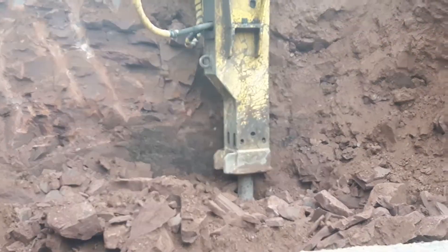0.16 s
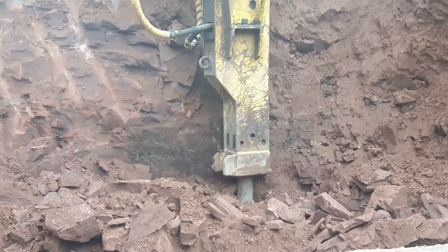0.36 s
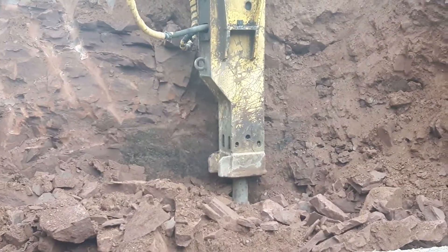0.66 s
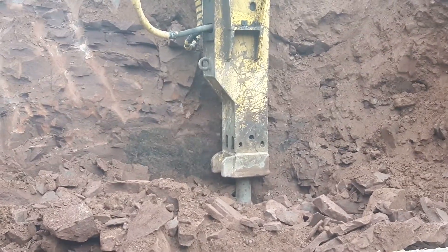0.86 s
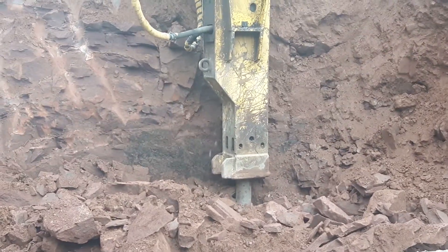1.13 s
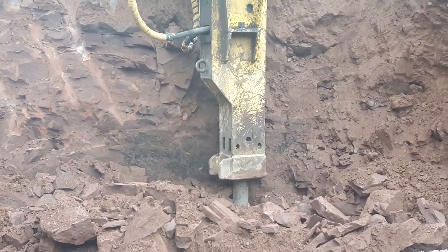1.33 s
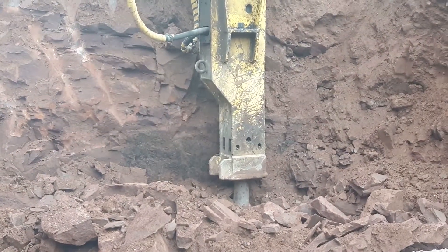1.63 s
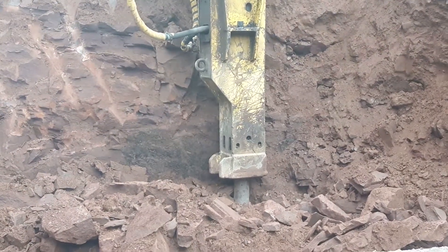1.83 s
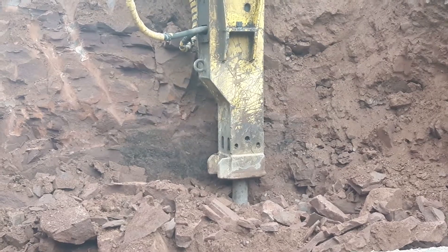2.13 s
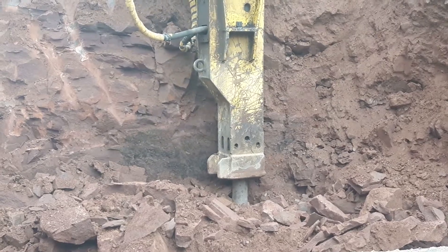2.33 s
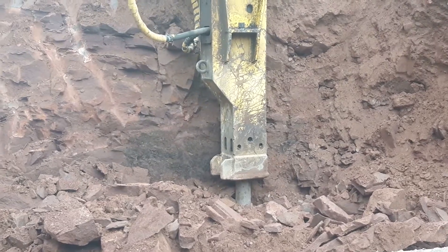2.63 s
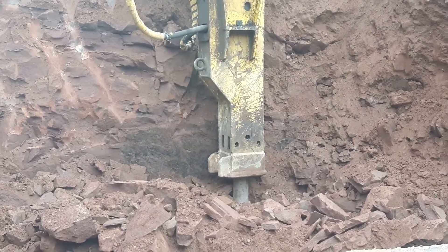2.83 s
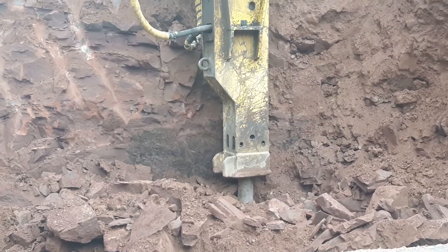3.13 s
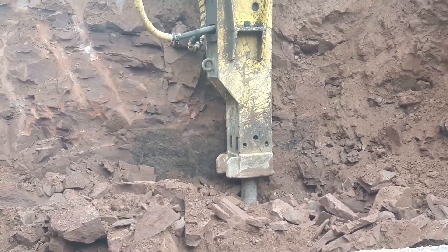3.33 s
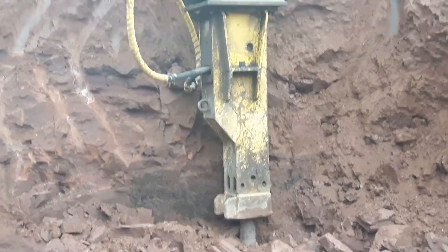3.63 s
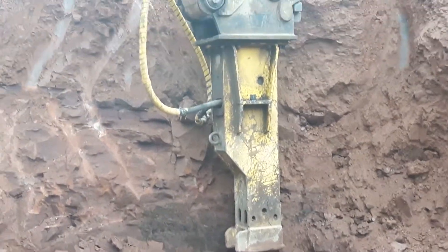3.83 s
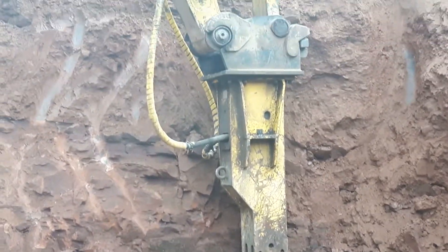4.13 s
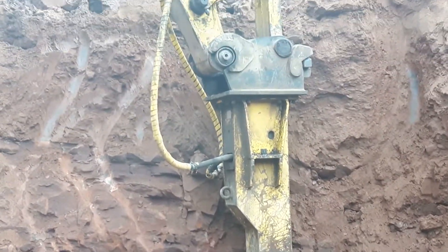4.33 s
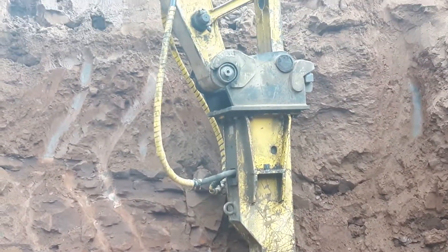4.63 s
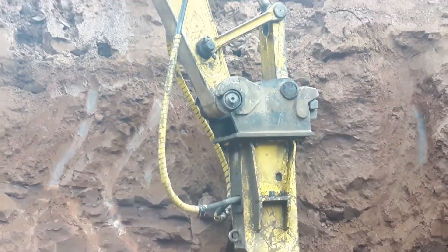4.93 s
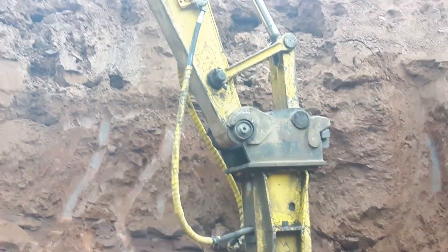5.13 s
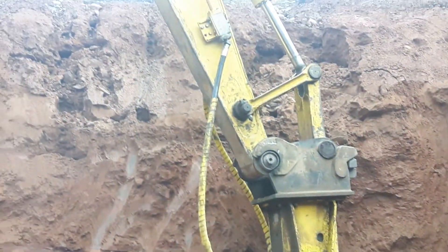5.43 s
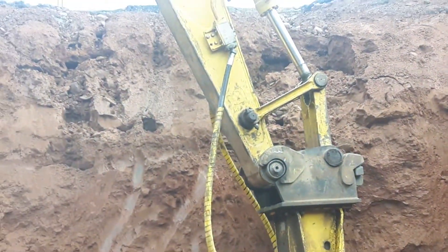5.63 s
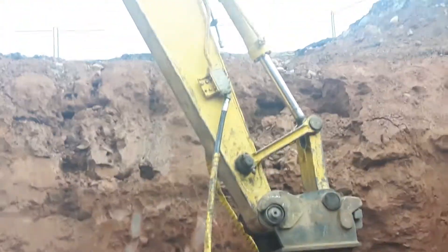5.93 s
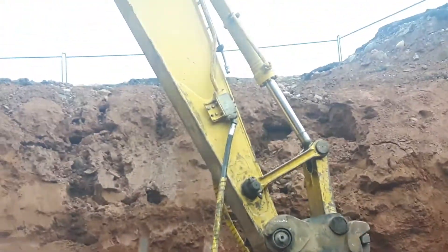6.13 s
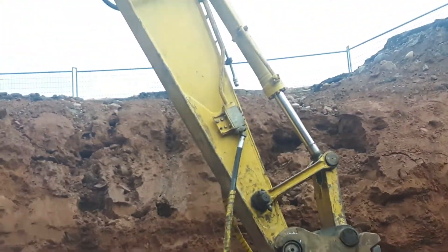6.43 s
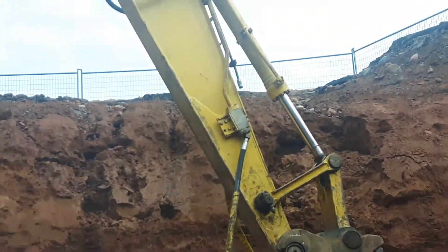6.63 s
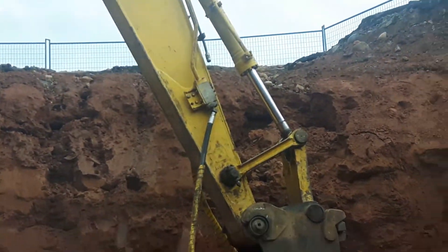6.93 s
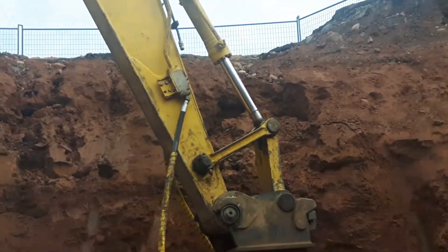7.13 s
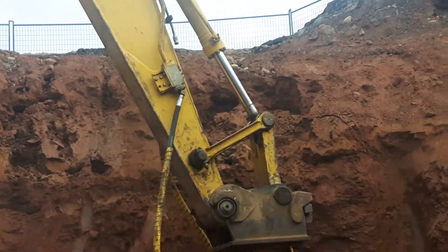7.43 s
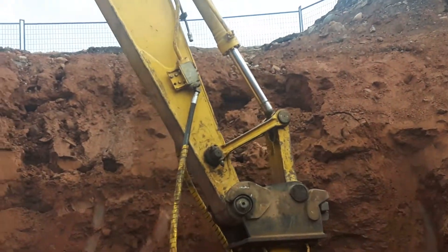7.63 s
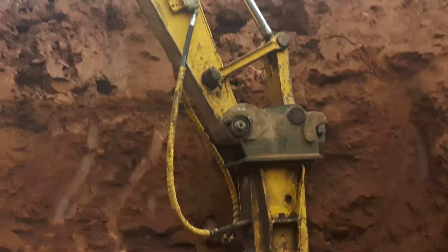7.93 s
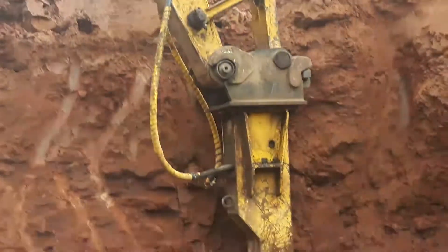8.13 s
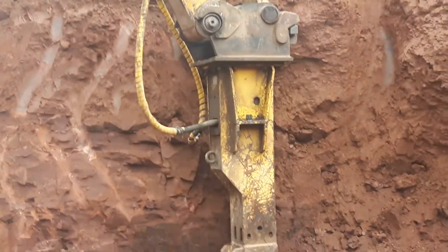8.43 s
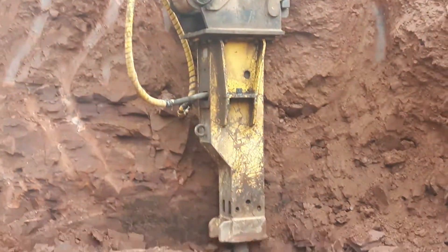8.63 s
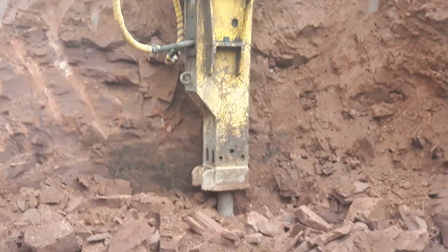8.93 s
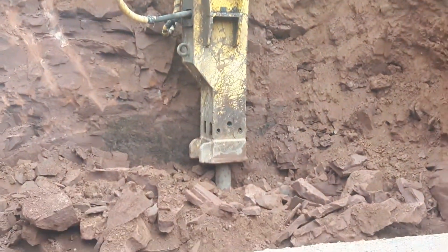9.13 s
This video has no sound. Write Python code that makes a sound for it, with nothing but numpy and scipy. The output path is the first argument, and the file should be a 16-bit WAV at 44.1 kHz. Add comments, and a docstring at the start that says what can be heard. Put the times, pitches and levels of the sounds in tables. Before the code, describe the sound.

Outdoors in a rock pit, loud machine hammering starts at once: dry, metallic, low-mid heavy blows with a bright click before each, almost identical. Around the middle the tool slips and the tone changes for a few strokes, then continues duller. After seven seconds the blows cease and the excavator engine hums on, low and throbbing, with faint oil hiss, wavering whine and a few muffled knocks. Single microphone whose level slowly recovers after the hammering.

```python
"""A valve snaps, then a hydraulic breaker strikes rock in an open pit, about eight blows a second, until it stops.
Each snap and blow is an impulse on damped steel modes and noise bands; ground and pit walls echo it dully.
Beneath runs a diesel: firing tones, throbbing noise, pump whine and oil hiss; loose parts knock as noise bursts.
A slow gain control lets the engine up once the blows have ceased."""
import sys
import numpy as np
from scipy import signal
from scipy.io import wavfile
from scipy.ndimage import uniform_filter1d

SR = 44100
rng = np.random.default_rng(int(sys.argv[2]) if len(sys.argv) > 2 else 0)


def file_out(sig):
    """Save sig as 16-bit WAV at sys.argv[1]."""
    # one column per channel
    cols = np.atleast_2d(sig).T
    # limit, then scale
    lim = np.clip(cols, -1, 1)
    pcm = np.round(lim * 32767).astype(np.int16)
    wavfile.write(sys.argv[1], SR, pcm)


N = 408807

# Modes of housing, tool and boom: f/Hz, relative level/dB at first, level/dB as the tool sinks in,
# level/dB once it has reseated, longest t60/s
STEEL_MODES = [(93.3, -29, -16, -28.5, 0.65), (166, -20, -19.5, -17, 0.27), (191.7, -9.5, -6, -11, 0.13),
               (251, -13, -17, -18, 0.14), (261.7, -13.5, -16, -20.5, 0.26), (288.1, -9.5, -6, -11.5, 0.26),
               (326.8, -3.5, -5, -4, 0.19), (400.5, -13.5, -20.5, -11, 0.45), (496.4, -28.5, -21.5, -23, 1),
               (547, -17, -14, -14.5, 0.26), (597, -15.5, -18, -14, .12), (761, 0.5, -6, -23, 0.077),
               (827.4, -20, -18, -6, 0.1), (859, -53, -72, -19.5, 0.54), (987.5, -84, -27.5, -45, 0.027),
               (1168.5, -21, -13, -13, 0.095), (1473.5, -20, -17, -20, 0.075),
               (1588, -20, -18, -25.5, 0.11), (1696, -21.5, -26.5, -11.5, 0.054),
               (1883, -26, -52, -30, 0.13), (2260, -60, -49, -27.5, 0.12), (2446, -22.5, -21, -19.5, 0.055),
               (2735, -26.5, -31, -43, 0.095), (2846, -30, -32.5, -28, 0.087),
               (3050, -73, -77, -27.5, 0.052), (3405, -33, -35, -54, 0.19), (3730, -69.5, -35, -34, 0.098),
               (4630, -36, -50, -43, 0.087), (5780, -24.5, -23, -18.5, 0.012), (6840, -32, -32, -52, .05),
               (8220, -50, -57, -57, 0.023), (7780, -29, -26.5, -35, 0.014), (9900, -32.5, -34, -60, .1),
               (15200, -57.5, -39, -36, .05)]
# Spectrum of the valve snap against that of the blow: f/Hz, level/dB
SNAP_SPECTRUM = [(100, -22.5), (400, -3.5), (1000, -6), (2000, 3.5), (2900, 0.5), (3500, 6.5), (4400, 13.5),
                 (5600, -5), (7900, 8.5), (10000, -3), (16000, 13.5)]
STAGES_S = 0.5, 3.5, 4.4, 4.7   # first, sunk in, slips, reseated
EDGES_HZ = 40 * 2 ** np.arange(0, 8.8, 1 / 3)   # third-octave band edges


def amp(db):
    """Decibel definition: amplitude ratio 10^(dB/20)."""
    return np.exp(np.asarray(db) * (np.log(10) / 20))


def rms_one(x):
    """Normalisation by mean power: scale to rms 1."""
    return x / np.sqrt(np.mean(x ** 2) + 1e-20)


def high_pass(x, order, hz):
    """Butterworth high-pass: maximally flat above its corner."""
    return signal.sosfilt(signal.butter(order, hz, "high", fs=SR, output="sos"), x)


def at_hz(points, hz):
    """Linear interpolation of a spectrum on a log-frequency axis."""
    table = np.array(points)
    return np.interp(np.log(hz), np.log(table[:, 0]), table[:, 1])


def brightness(hz):
    """Octave scale: 0 up to 1 kHz (the body), rising to 1 from 4 kHz (the treble)."""
    return np.clip(np.log2(hz / 1000) / 2, 0, 1)


def bump(hz, centre_hz, spread):
    """Gaussian resonance bell on an octave axis, top 1."""
    return np.exp(-(np.log2(hz / centre_hz) / spread) ** 2)


def drift(rate_hz):
    """Low-passed white noise: a slow random wander of rms 1."""
    step = 40   # samples between computed points
    r = np.exp(-2 * np.pi * rate_hz * step / SR)
    white = rng.standard_normal(N // step + 2002)
    slow = signal.lfilter([1], [1, -2 * r, r * r], white)[2000:]   # drop the filter's start
    return np.interp(np.arange(N) / step, np.arange(len(slow)), rms_one(slow))


def clicks(times, gains):
    """Impulse train: single samples at the given times."""
    out = np.full(N, 1e-18)
    out[np.round(np.asarray(times) * SR).astype(int)] = gains
    return out


def dying(train, t60, rise_s):
    """Exponential decay: each click opens an envelope that rises fast and dies in t60."""
    rise = np.exp(-1 / (rise_s * SR))
    decay = amp(-60 / (t60 * SR))
    return signal.lfilter([1 - rise], np.convolve([1, -rise], [1, -decay]), train)


def ring(drive, hz, t60):
    """Damped harmonic oscillator: a unit click sets a decaying sine of height 1 ringing."""
    r, w = amp(-60 / (t60 * SR)), 2 * np.pi * hz / SR
    return signal.lfilter([0, np.sin(w)], [1, -2 * r * np.cos(w), r * r], drive)


def band_filters():
    """Third-octave analysis: centre frequencies with cascaded band-passes."""
    for low, high in zip(EDGES_HZ, EDGES_HZ[1:]):
        sos = signal.butter(1, [low, high], "band", fs=SR, output="sos")
        yield np.sqrt(low * high), np.vstack([sos, sos])


def bands(white):
    """White-noise principle: equal power per Hz in each band, two noises dealt in turn."""
    for k, (hz, sos) in enumerate(band_filters()):
        yield hz, signal.sosfilt(sos, white[k % 2])


def self_noise():
    """Thermal-type white noise: the microphone's faint hiss, rms -90 dB."""
    return amp(-90) * rng.standard_normal(N)


def engine():
    """Periodic combustion: firing orders and throbbing noise, with phase-locked pump whine and turbulent oil hiss."""
    # Course of the engine: t/s, firing f/Hz, load gain/dB, oil hiss level/dB, pump whine level/dB
    course = [(0, 92.55, 13, -58.5, -56), (7.1, 92, 10, -56, -43), (7.4, 95.56, 6, -71, -53),
              (7.801, 96.35, 6, -74, -50.5), (8.0, 96.48, 4.5, -73, -45), (8.3, 95.8, 5, -71, -43),
              (8.6, 95.6, 6, -65, -45.5), (8.72, 94.6, 4, -65, -39), (8.9, 95.64, 6.5, -63.5, -48),
              (9.02, 93.5, 3.5, -64.5, -43), (9.27, 96.6, 0.5, -66, -41.5)]
    # Clean tones before the load gain: multiple of firing f, rms level/dB, waver/dB
    orders = [(0.99, -40.5, 0.9), (2.2, -44.5, 5.3), (10 / 3, -52, 2.2)]
    # Exhaust, fan and panels: f/Hz, relative spectral density level/dB
    rumble_spectrum = [(18, -80), (30, -39), (55, -14), (77, -8.5), (97, -3), (125, 1.5), (155, 7),
                       (193, 14), (239, -6), (323, 2.5), (445, -10), (563, -6.5), (669, -13.5), (1500, -26),
                       (5000, -79), (6500, -87), (11000, -120)]
    # Oil in the valves: f/Hz, relative spectral density level/dB
    hiss_spectrum = [(1470, -1), (2500, 2), (3350, -4), (3940, 2), (4570, -54), (5130, -8), (6170, -2),
                     (7430, -16), (10500, -7), (15800, -12)]
    whine_order = 6   # multiple of the firing frequency

    s, *columns = np.transpose(course)
    firing_hz, load_db, hiss_db, whine_db = [np.interp(np.arange(N) / SR, s, c) for c in columns]
    phase = 2 * np.pi * np.cumsum(firing_hz * (1 + 0.00073 * drift(2.6))) / SR
    tones = 0
    for order, level_db, waver_db in orders:
        sine = np.sin(order * phase + rng.uniform(0, 2 * np.pi))
        tones = tones + amp(level_db + waver_db * drift(1.8)) * np.sqrt(2) * sine
    throb = 1 + 0.083 * np.cos(phase / 3) + 0.25 * np.cos(phase)
    together, rumble, hiss = drift(4.4), 0, 0   # together: level wander common to all rumble bands
    for hz, band in bands(rng.standard_normal((2, N))):
        rumble = rumble + amp(at_hz(rumble_spectrum, hz) + 0.49 * together + 1.8 * drift(7.4)) * band
        hiss = hiss + amp(at_hz(hiss_spectrum, hz)) * band
    body = amp(load_db) * (tones + amp(-36.5) * throb * rms_one(rumble))
    whine = amp(whine_db) * np.sqrt(2) * np.sin(whine_order * phase)
    return body + whine + amp(hiss_db) * rms_one(hiss)


def knocks():
    """Impact excitation: band-limited noise bursts, heard directly and through the steel modes."""
    # Loose parts knocking: t/s, relative level/dB, low edge f/Hz, high edge f/Hz, t60/s
    impacts = [(7.667, -43.5, 300, 1500, 0.13), (7.853, -37.5, 860, 1260, 0.1),
               (7.979, -52, 690, 1580, 0.084), (8.448, -42, 300, 2270, 0.14), (8.468, -43, 700, 2000, 0.12),
               (8.781, -31, 223, 960, 0.12), (8.797, -32, 273, 674, 0.21), (8.921, -38, 446, 1920, 0.073),
               (8.948, -36, 450, 1360, 0.081)]
    out = np.zeros(N)
    t = np.arange(SR // 3) / SR
    for at, level_db, low_hz, high_hz, t60 in impacts:
        envelope = (1 - np.exp(-t / 0.00071)) * amp(-60 * t / t60)
        burst = rng.standard_normal(len(t)) * envelope
        burst += amp(-38) * sum(ring(burst, hz, t60=0.06) for hz, *_ in STEEL_MODES)
        band = signal.butter(3, [low_hz, high_hz], "band", fs=SR, output="sos")
        start = round(at * SR)
        knock = amp(level_db) * np.sqrt(SR / high_hz) * signal.sosfilt(band, burst)
        out[start:start + len(t)] += knock[:N - start]
    return out


def strokes():
    """Near-periodic excitation: snap and contact times and levels, each a little uneven."""
    # Even strokes, the pace sagging where the tool slips: first snap t/s, number of strokes, period/s,
    # fall of the piston from snap to contact/s
    runs = [(0.0059, 16, .12723, .0331), (2.0427, 8, .1274, .0322), (3.0614, 10, .12702, .0317),
            (4.3444, 2, .1341, .0328), (4.6148, 10, .12915, .0336), (5.9036, 9, .12755, .0334),
            (7.0489, 1, .125, .0328)]
    # Mean strength: t/s, blow level/dB, treble level/dB, snap level against the blow/dB
    force = [(0, -3.5, 0, -8), (0.7, -3, 0.5, -12.5), (1.5, -3, 0.5, -10.5), (2.0, -3, 1.5, -9),
             (2.7, -3.5, -1, -7), (3.7, -3, -1, -10.5), (4.1, -2.5, 0, -11.5), (4.34, -1.5, -4.5, -11.5),
             (4.74, -5.5, 1, -8), (4.87, -3, -2, -8.5), (5.26, -4.5, -0.5, -12.5), (5.9, -4.5, -0.5, -14),
             (6.5, -5, -2.5, -12.5), (7.05, -5, -3, -11.5)]
    uneven_s, uneven_db = 0.00025, (0.4, 0.6, 1.1)   # spreads: time; blow, treble, snap

    s = np.concatenate([first + period * np.arange(count) for first, count, period, _ in runs])
    fall_s = np.concatenate([np.full(count, fall) for _, count, _, fall in runs])
    chance = rng.standard_normal((len(s), 4))
    at, *columns = np.transpose(force)
    levels_db = np.array([np.interp(s, at, c) for c in columns]) + (chance[:, 1:] * uneven_db).T
    s = s + uneven_s * chance[:, 0]
    return s, s + fall_s, *levels_db


def slip_db(s, hz):
    """Spectral weighting in time: the blows change colour for a few strokes while the tool slips."""
    # Colour changes: middle t/s, reach/s, centre f/Hz, level/dB, spread/octaves
    slips = [(4.42, 0.11, 1500, 4.5, 0.15), (4.68, 0.13, 3630, 5, 0.18), (4.71, 0.14, 211, 8.5, 0.7)]
    total_db = 0
    for at, reach, centre_hz, db, spread in slips:
        nearness = np.clip(2 - 2 * np.abs(s - at) / reach, 0, 1)
        total_db = total_db + db * bump(hz, centre_hz, spread) * nearness
    return total_db


def repeating_noise(times, likeness):
    """Correlated excitation: the same steel is struck alike, so each noise nearly repeats the last."""
    length = SR // 5
    starts = np.round(np.r_[0, times] * SR).astype(int)
    fresh = rng.standard_normal((2, len(starts) + 30, length))
    keep = np.clip(likeness, 0, .99)
    rows = signal.lfilter([np.sqrt(1 - keep ** 2)], [1, -keep], fresh, axis=1)[:, 30:]
    stroke = np.searchsorted(starts, np.arange(N), "right") - 1
    return rows[:, stroke, (np.arange(N) - starts[stroke]) % length]


def steel_ringing(blows, noise):
    """Modal superposition: snap, recoil, push and rebound drive damped modes, with noise for the high ones."""
    s, hit, peak_db, treble_db, snap_db = blows
    push_s, rebound_s, valve_seats_s = 0.0027, 0.0145, 0.0149   # after contact, contact, snap
    most_cycles = 300   # a mode of the bolted steel rings no longer
    out = np.zeros(N)
    for hz, first_db, sunk_db, late_db, t60 in STEEL_MODES:
        bright = brightness(hz)
        mode_db = np.interp(s, STAGES_S, [first_db, sunk_db, sunk_db, late_db])
        level_db = peak_db + mode_db + bright * treble_db + slip_db(s, hz)
        gain = amp(level_db + 1.0 * rng.standard_normal(len(s)))
        snap = clicks(s, gain * amp(snap_db + at_hz(SNAP_SPECTRUM, hz)))
        rattle = amp(-21.5) * noise[0] * dying(snap + clicks(hit, gain), t60=0.1, rise_s=0.00081)
        push = clicks(hit + push_s, gain) - clicks(hit, .5 * gain)   # the housing recoils, then follows
        push += clicks(hit + rebound_s, 3.4 * gain * bump(hz, 1430, 0.24))
        push += clicks(s + valve_seats_s, 0.17 * gain) + snap
        drive = (1 - 0.85 * bright) * push + np.clip(0.23 + bright, 0, 1) * rattle
        out += ring(drive, hz, min(t60, most_cycles / hz))
    return out


def rock_clatter(blows, noise):
    """Statistical reverberation: dense small modes and breaking rock as noise dying band by band."""
    s, hit, peak_db, treble_db, snap_db = blows
    # Clatter: f/Hz, relative spectral density level/dB
    spectrum = [(50, -42), (80, -8), (200, -2), (450, -2.5), (850, -4), (1100, -12), (1600, -8),
                (2100, -25.5), (3000, -22.5), (5100, -34.5), (8000, -36), (12000, -37.5), (16000, -34)]
    # Its decay: f/Hz, t60/s
    decay = [(80, 0.43), (300, 0.64), (1000, 0.29), (1800, 0.23), (3000, 0.19), (5000, .15), (10000, 0.19)]
    # Its change once the tool has reseated: f/Hz, level/dB
    reseated = [(150, -4.5), (400, 0.5), (900, 0), (2500, 5), (6000, 3.5), (12000, -0.5)]
    seated = np.interp(s, STAGES_S[2:], [0, 1])
    out = np.zeros(N)
    for k, (hz, sos) in enumerate(band_filters()):
        bright = brightness(hz)
        level_db = peak_db + at_hz(spectrum, hz) + seated * at_hz(reseated, hz)
        contact = clicks(hit, amp(level_db + slip_db(s, hz) + bright * treble_db))
        blow = dying(contact, at_hz(decay, hz), rise_s=0.00041)
        blow += 0.2 * bright * dying(contact, t60=0.011, rise_s=0.0027)
        snap_clicks = clicks(s, amp(level_db + snap_db + at_hz(SNAP_SPECTRUM, hz)))
        snap = dying(snap_clicks, t60=0.085, rise_s=0.0029)
        out += signal.sosfilt(sos, noise[k % 2] * np.sqrt(blow ** 2 + snap ** 2))   # powers add
    return high_pass(rms_one(out), 2, 170)   # small parts have no bass


def push_thump(blows):
    """Pressure impulse: the bare push of each blow is a strongly damped 520 Hz pulse."""
    s, hit, peak_db, *_ = blows
    stage_db = np.interp(s, STAGES_S[:2], [-20, -15])   # first, sunk in
    return ring(clicks(hit + 0.0019, amp(peak_db + stage_db)), 520, t60=0.0043)


def breaker():
    """Impact radiation and reflection: ringing, clatter and thump, then dull echoes."""
    # Ground and pit walls: delay t/s, level/dB
    echoes = [(.012, -18.5), (0.029, -12.5), (0.0501, -10), (0.086, -24.5)]
    blows = strokes()
    noise = repeating_noise(blows[0], likeness=.96)
    direct = amp(-2) * steel_ringing(blows, noise) + amp(-18) * rock_clatter(blows, noise) + push_thump(blows)
    direct = high_pass(direct, 3, 80)   # too small to radiate deep bass
    dull = signal.sosfilt(signal.butter(1, 900, fs=SR, output="sos"), direct)
    for lag_s, level_db in echoes:
        lag = round(lag_s * SR)
        direct[lag:] += amp(level_db) * dull[:-lag]
    return direct


def scene():
    """Linear superposition: all sources add at one microphone."""
    return (self_noise() + engine() + knocks() + breaker())[None]


def record(dry):
    """Peak-controlled gain with slow release, then soft saturation and band-limiting."""
    target_db, release_db_per_s, most_gain_db = -2, 6, 12
    dry = high_pass(dry, 3, 60)
    ramp_db = release_db_per_s * np.arange(N) / SR
    level_db = 20 * np.log10(np.abs(dry) + 1e-9)
    # each peak is held, then falls at the release rate
    held_db = np.maximum(np.maximum.accumulate(level_db + ramp_db, axis=1), target_db) - ramp_db
    gain_db = np.clip(target_db - held_db, 0, most_gain_db)
    loud = dry * amp(uniform_filter1d(gain_db, size=200, axis=1))
    rounded = 1.138 * np.tanh(loud / 1.362)
    return signal.sosfilt(signal.cheby2(16, 60, 16000, fs=SR, output="sos"), rounded)


dry = scene()
out = record(dry)
file_out(out)
```